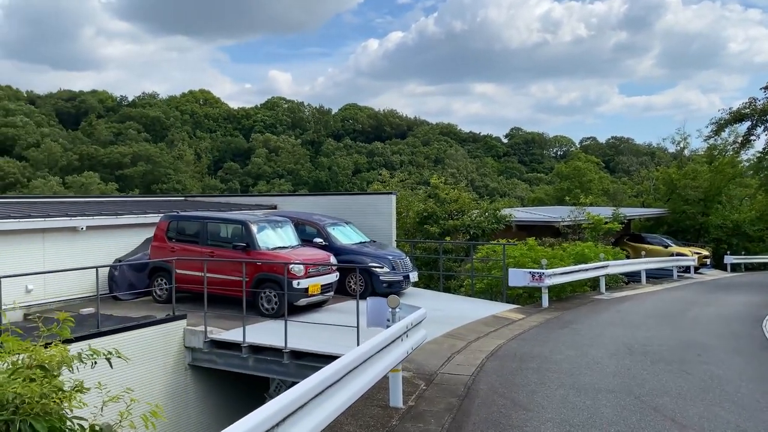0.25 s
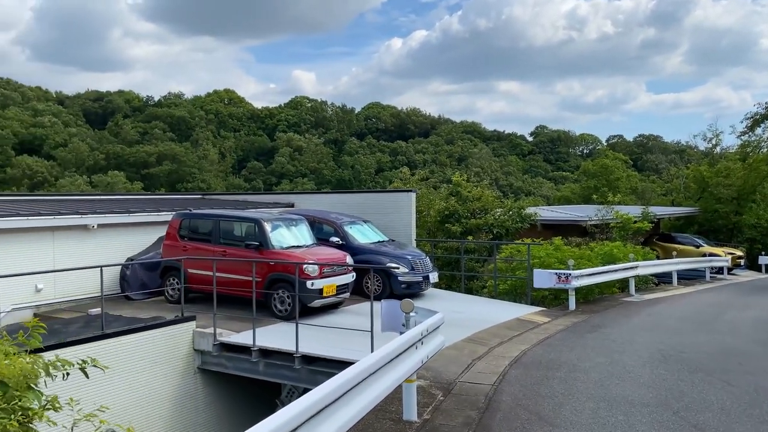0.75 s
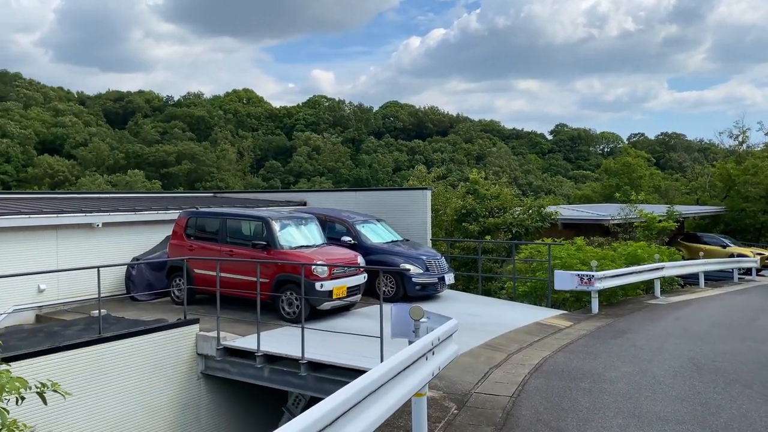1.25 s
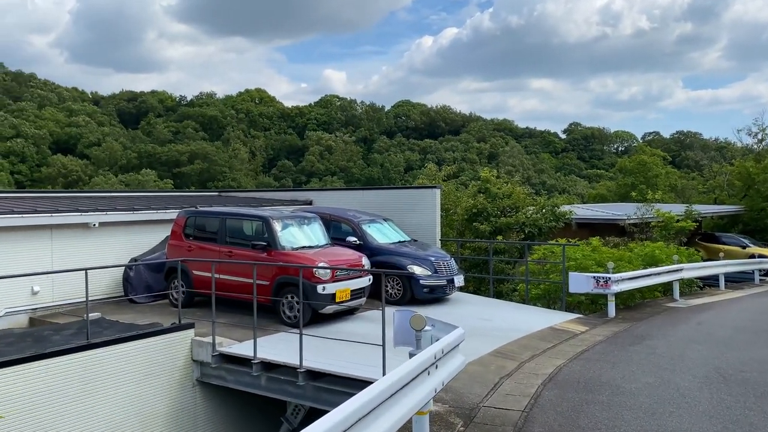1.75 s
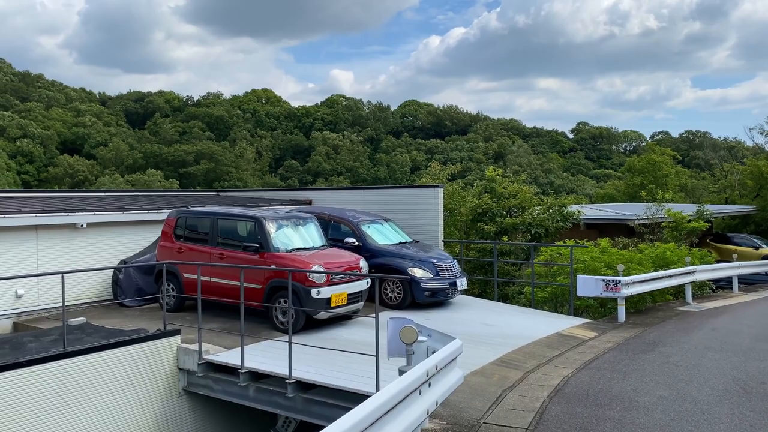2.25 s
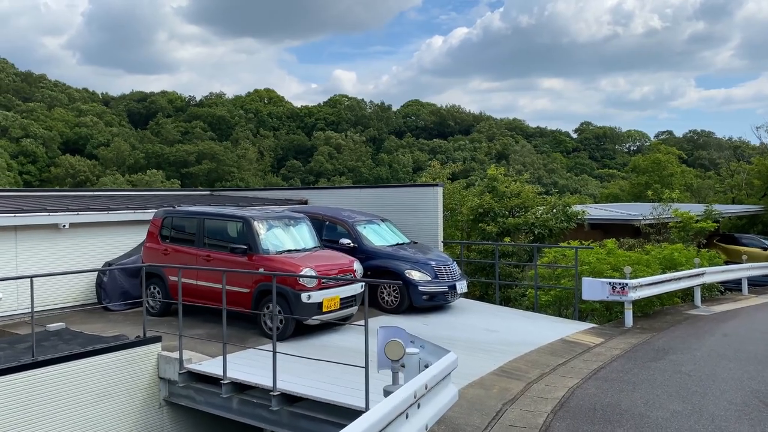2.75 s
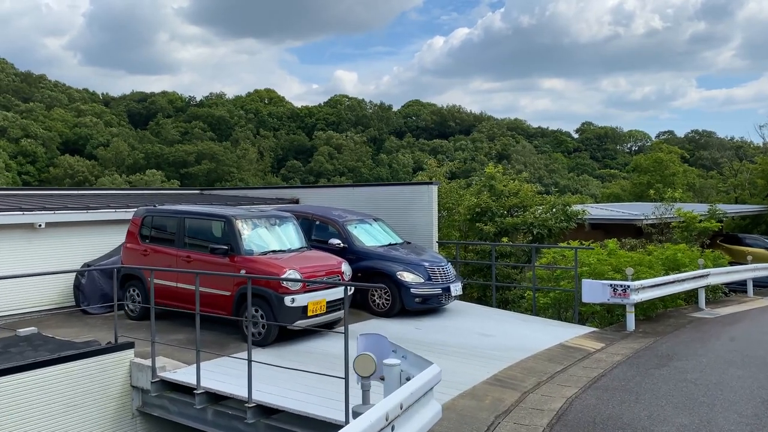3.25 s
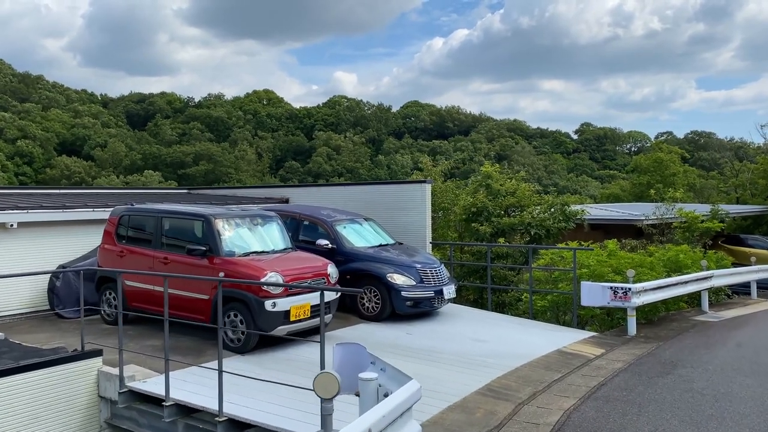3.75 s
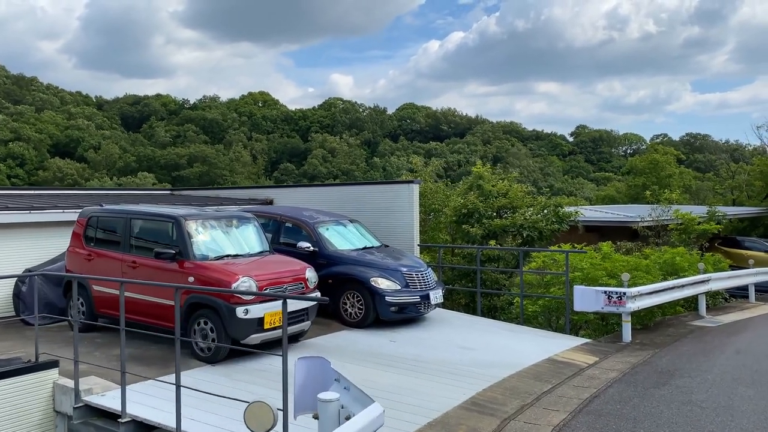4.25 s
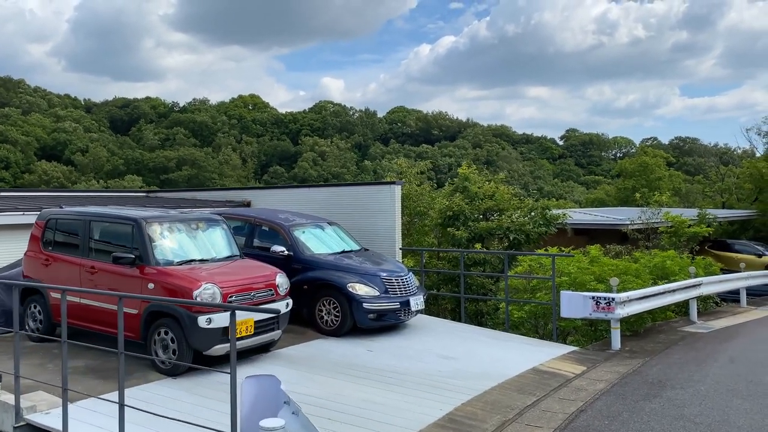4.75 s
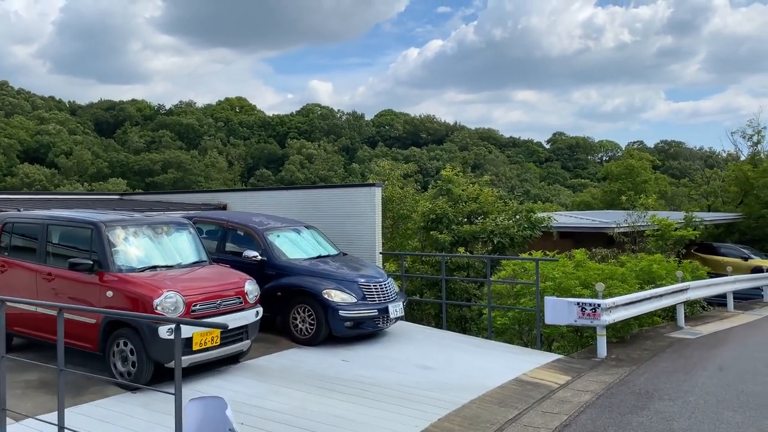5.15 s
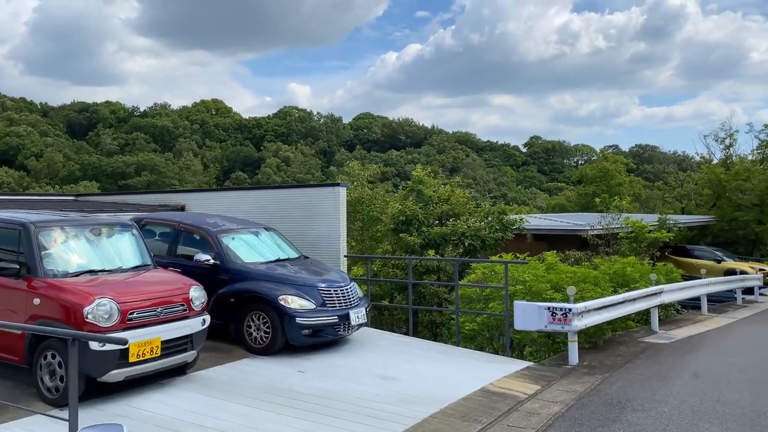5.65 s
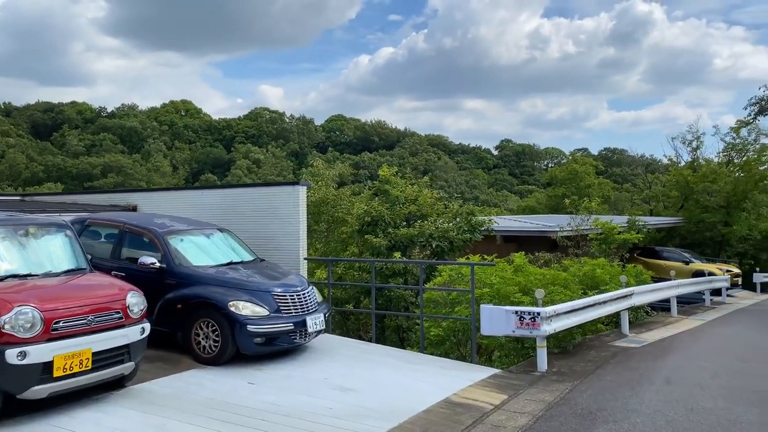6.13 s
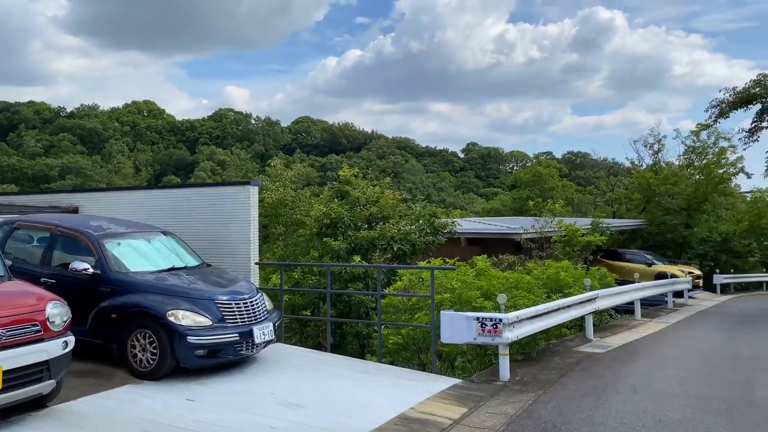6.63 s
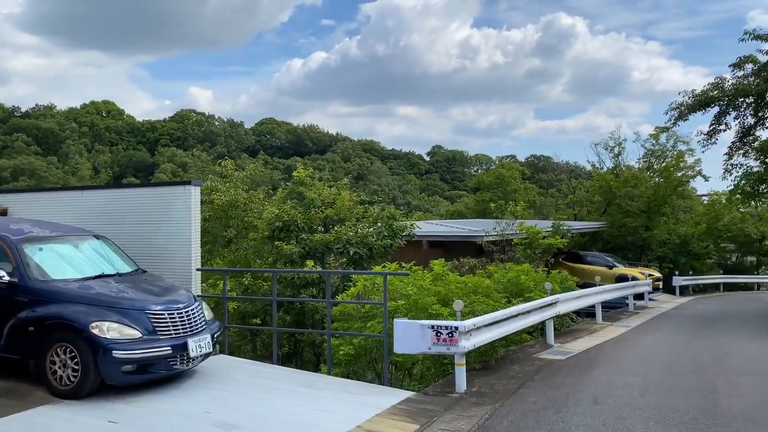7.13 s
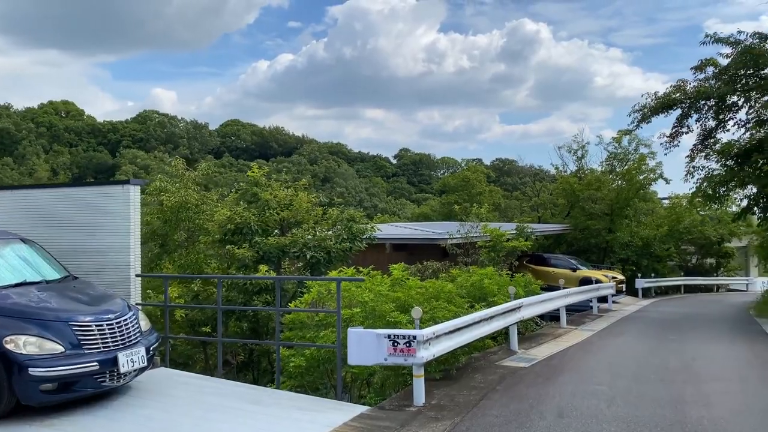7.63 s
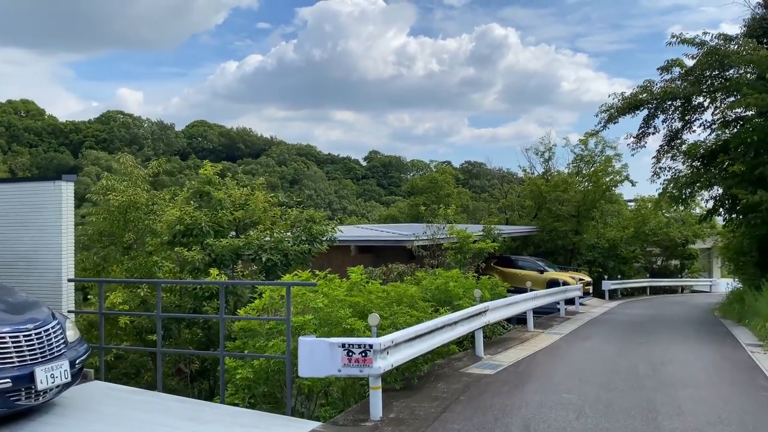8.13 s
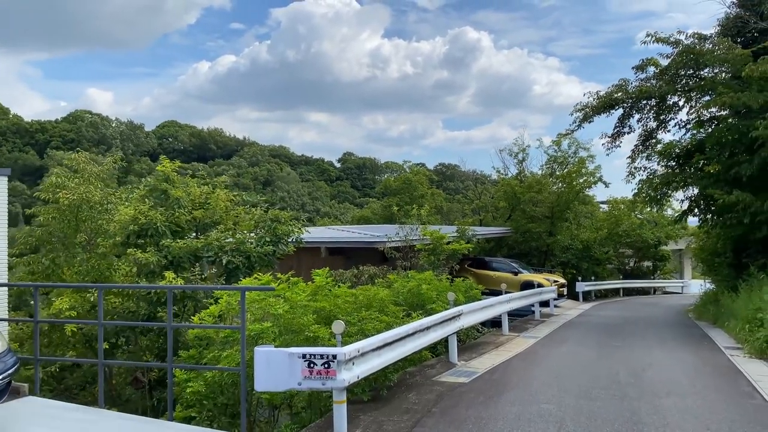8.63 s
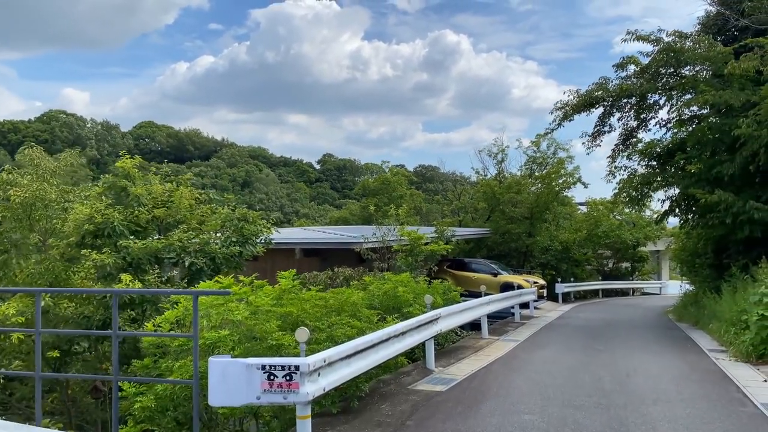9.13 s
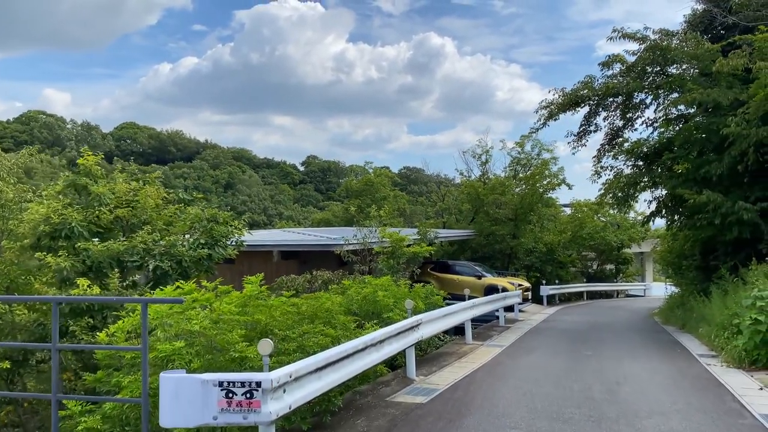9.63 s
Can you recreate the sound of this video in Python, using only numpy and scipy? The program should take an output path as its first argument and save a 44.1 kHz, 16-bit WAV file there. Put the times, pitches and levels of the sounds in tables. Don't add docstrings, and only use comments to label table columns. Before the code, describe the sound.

A dense, unbroken cicada chorus shimmers brightly over a quiet hillside road, with faint walking ticks and low hand-held rumble beneath it.

```python
import sys
import numpy as np
from scipy import signal
from scipy.fft import rfft, irfft
from scipy.io import wavfile
from scipy.ndimage import uniform_filter1d

SR = 44100
rng = np.random.default_rng(int(sys.argv[2]) if len(sys.argv) > 2 else 0)


def output_pcm(signal):
    pcm = np.clip(np.atleast_2d(signal).T, -1, 1) * 32767
    wavfile.write(sys.argv[1], SR, np.round(pcm).astype(np.int16))


def gain_from_decibels(decibels):
    exponent = np.asarray(decibels, float) / 20
    return 10 ** exponent


N = 435708

# pitch_hz, level_db (per Hz)
SONG_SPECTRUM = [(1940, -44), (3300, -27.5), (3730, -23.5), (5060, -2.5), (5760, 0.5), (6950, -4),
                 (8440, -0.5), (8830, -4), (9790, -15.5), (10300, -17), (12900, -12.5), (14400, -9),
                 (15500, -9)]
BAND_EDGES_HZ = (4900, 7000, 10200)
# start_db, approach_db_per_s (walking nearer), effort_share, view_db (gain by the open view)
SONG_BANDS = [
    (-63, 0.8759, 0.64, -0.9),
    (-46.5, 0.3634, 0.95, 0.3),
    (-47.5, -0.075, .5, 2.6),
    (-55, 0.56, .3, 0.3),
]
# time_s, effort_db
CROWD_EFFORT = [(0, 0.4), (.9, 0), (1.5, 1.2), (2.2, -0.7), (3.4, -0.1), (4.2, 0.1), (5.2, -1), (6.9, -0.6),
                (7.5, -0.1), (8.9, 0.74), (9.2, -0.5), (9.88, -0.5)]
# time_s, clicks_per_s
SOLO_CLICK_RATE = [(0, 397.6), (6.5, 398.4), (9.88, 399.5)]
# pitch_hz, gain_db
SOLO_COLOUR = [(4600, -10), (5300, -2), (6300, -1.5), (7000, -18), (11000, -4), (13000, 0.5), (14300, 3),
               (15700, 0)]
# time_s, effort_db
SOLO_EFFORT = [(0, 1.5), (1.2, -3), (3, -5), (4.2, 0), (5.4, -0.5), (7.2, -4), (8.2, -4), (9.88, 1)]
# time_s, pitch_hz, level_db
LOW_WHISTLE = [(0, 2670, -75), (.8, 2690, -84), (2.2, 2720, -73), (3.7, 2735, -75), (6.2, 2750, -73.5),
               (8.2, 2765, -71.5), (9.88, 2750, -75)]
# time_s, pitch_hz, level_db
HIGH_WHISTLE = [(0, 2890, -74), (.7, 2870, -84), (2.8, 2970, -78), (4.5, 3000, -72), (5.8, 2977, -72),
                (7.7, 3015, -75), (8.7, 3010, -77.5), (9.88, 2990, -65)]
# pitch_hz, level_db (per Hz)
VALLEY_SPECTRUM = [(16, -47), (28, -6.5), (35, -4.5), (48, -16.5), (91, -26), (119, -33.5), (161, -29),
                   (314, -40), (1040, -43.5), (1920, -49), (2210, -46), (2710, -39.5), (3250, -46.5),
                   (3600, -51), (4680, -67), (7920, -120)]
# centre_hz, width_hz, level_db
ARM_RESONANCES = [(2.64, 1.9, -6), (6.04, 1.2, 2), (9.4, 4.1, -7), (14.8, 3.1, -8), (20.8, 2.9, -19)]
# time_s, swing_db (of the arm), knock_db (through the grip)
JOLTS = [(.08, -31.5, -51), (.62, -29, -62), (.85, -30, -54), (1.119, -31, -56), (1.499, -40.5, -57),
         (1.9, -30.5, -69), (2.5, -26, -58), (3.18, -31.5, -57), (3.65, -38, -65), (4.03, -45, -59),
         (4.28, -34, -58), (4.8, -33.5, -63), (5.08, -36.5, -62), (5.45, -36, -61), (5.8, -33.5, -65),
         (6.65, -32.5, -64), (7.05, -35.5, -62), (7.3, -34.5, -67), (7.65, -37, -93), (7.969, -33, -73),
         (8.22, -33, -68), (8.55, -38, -56), (8.82, -39, -67), (9.15, -30.5, -67), (9.65, -34.5, -76)]
# start_s, peak_db, pitch_hz
CONTACTS = [(.025, -60, 3080), (.225, -78, 800), (.718, -59, 149), (1.122, -62, 148), (1.198, -63, 376),
            (1.298, -66, 505), (1.352, -54, 3100), (1.380, -59, 2980), (2.409, -59, 378), (2.510, -61, 573),
            (3.104, -66, 456), (4.338, -61, 330), (4.858, -62, 570), (4.942, -61, 304), (4.943, -59, 580),
            (4.944, -61, 880), (5.441, -60, 1750), (5.441, -63, 1350), (5.442, -61, 816), (5.98, -59, 150),
            (6.062, -61, 900), (7.401, -59, 446), (7.898, -60, 1680), (8.490, -58, 1200), (9.215, -55, 75),
            (9.220, -52, 148), (9.681, -61, 1260)]
# start_s, end_s, pitch_hz, level_db
FAR_HUM = [
    (0.33, .55, 216.3, -71.5),
    (2.845, 3.204, 214, -70.5),
]
# centre_s, centre_hz
PARTINGS = [(.256, 7600), (.256, 11750), (.337, 9100), (.42, 13100), (.42, 8650), (.813, 7650),
            (.813, 5200), (1.162, 14100), (2.031, 6500), (2.031, 9700), (2.137, 12750), (2.137, 4900),
            (2.137, 7040), (2.857, 11400), (3.309, 14400), (3.309, 6370), (3.447, 5830), (4.135, 11100),
            (4.135, 5200), (5.49, 10300), (5.723, 9700), (5.723, 6300), (6.234, 7600), (6.502, 6260),
            (6.782, 4760), (7.0, 13050), (7.0, 9700), (7.175, 9650), (7.175, 12100)]

SONG_TOP_HZ = 15745
VIEW_OPENS_S, VIEW_WIDENS_S = 4.8, 0.32
THROBS_PER_S, THROB_WANDER = 15.8, 0.015
WHISTLE_FLUTTER_DB = 1.4
VALLEY_LEVEL_DB = -67.0
RUMBLE_DB, RUMBLE_FOLLOWS = -74, 0.19
JOLT_RISE_S, SWING_FADE_S, KNOCK_FADE_S = 0.067, 0.18, 0.12
REST_SWING_DB, REST_THRUM_DB = -41.5, -65
TICK_T60_S, RING_CYCLES = 0.022, 5.2
PARTING_WIDTH_HZ = 1400


def rms_one(x):
    return x / np.sqrt(np.mean(x ** 2) + 1e-20)


def in_time(rows):
    time_s, *columns = np.transpose(rows)
    return [np.interp(np.arange(N) / SR, time_s, column) for column in columns]


def over_pitch(values):
    return np.interp(np.linspace(0, len(values) - 1, N // 2 + 1), np.arange(len(values)), values)


def colour(points):
    hz = np.maximum(np.arange(N // 2 + 1) * SR / N, 0.1)
    point_hz, point_db = np.transpose(points)
    return hz, gain_from_decibels(np.interp(np.log(hz), np.log(point_hz), point_db))


def drift(rate_hz):
    pole = np.exp(-80 * np.pi * rate_hz / SR)
    white = rng.standard_normal(N // 40 + 4002)
    slow = signal.lfilter([1], [1, -2 * pole, pole * pole], white)[4000:]
    return np.interp(np.arange(N) / 40, np.arange(len(slow)), rms_one(slow - slow.mean()))


def jolted(levels_db, fade_s, rest_db):
    t = np.arange(0, N, 64) / SR
    power = gain_from_decibels(2 * rest_db)
    for (jolt_s, *_), level_db in zip(JOLTS, levels_db):
        since = t - jolt_s
        rise, fade = since / JOLT_RISE_S * 2, -(since / fade_s) ** 2
        power = power + gain_from_decibels(2 * level_db) * np.exp(np.where(since < 0, rise, fade))
    return np.interp(np.arange(N) / SR, t, 10 * np.log10(power))


def singer(clicks_per_s, loudness, uneven_db, scatter_s, weak_drum_db):
    count = np.floor(rng.random() + np.cumsum(clicks_per_s) / SR)
    beat = (np.diff(count, prepend=0) > 0) * gain_from_decibels(weak_drum_db * (count % 2))
    clicks = beat * loudness * gain_from_decibels(uneven_db * rng.standard_normal(N))
    delay_s = scatter_s * over_pitch(rng.random(400))
    phase = 2 * np.pi * np.cumsum(delay_s) * SR / N
    return rfft(clicks / np.sqrt(np.mean(clicks_per_s))) * np.exp(-1j * phase)


def far_crowd():
    bodies = gain_from_decibels(8 * rng.standard_normal((18, 120)))
    bodies = bodies / np.sqrt(np.sum(bodies ** 2, axis=0))
    crowd = 0
    for clicks_per_s, body in zip(np.geomspace(300, 520, 18), bodies):
        rate = clicks_per_s * (1 + 0.01 * drift(0.4) + 0.007 * drift(25))
        swell = gain_from_decibels(1.3 * drift(0.3) + 0.8 * drift(20))
        voice = singer(rate, swell, uneven_db=3.5, scatter_s=0.017, weak_drum_db=-0.5)
        crowd = crowd + over_pitch(body) * voice
    return crowd / np.sqrt(uniform_filter1d(np.abs(crowd) ** 2, size=500))


def near_singer():
    throbs_per_s = THROBS_PER_S * (1 + THROB_WANDER * drift(0.44))
    throb_phase = 2 * np.pi * np.cumsum(throbs_per_s) / SR + 1.14 + 0.53 * drift(1.1)
    throb = 1 + 1.8 * np.cos(throb_phase)
    effort_db, = in_time(SOLO_EFFORT)
    rate = in_time(SOLO_CLICK_RATE)[0] * (1 + 0.0012 * drift(1.5) + 0.0012 * drift(30))
    return singer(rate, throb * gain_from_decibels(effort_db), uneven_db=0.5, scatter_s=0.008, weak_drum_db=-5.0)


def chorus():
    crowd, solo = far_crowd(), near_singer()
    match = np.sqrt(np.mean(np.abs(crowd) ** 2) / np.mean(np.abs(solo) ** 2))
    solo = solo * match * gain_from_decibels(-8.5) * colour(SOLO_COLOUR)[1]
    hz, song = colour(SONG_SPECTRUM)
    voices = (crowd + solo) * song * (hz < SONG_TOP_HZ)
    above = [1] + [1 / (1 + np.exp((edge_hz - hz) / 250)) for edge_hz in BAND_EDGES_HZ] + [0]
    t = np.arange(N) / SR
    effort_db, = in_time(CROWD_EFFORT)
    view = 1 / (1 + np.exp((VIEW_OPENS_S - t) / VIEW_WIDENS_S))
    flutters_db = (1.3, 0.3, 0.2, 0.3)
    out = 0
    for lower, upper, settings, flutter_db in zip(above, above[1:], SONG_BANDS, flutters_db):
        start_db, approach_db_per_s, effort_share, view_db = settings
        level_db = start_db + approach_db_per_s * t + effort_share * effort_db + view_db * view
        band = rms_one(irfft(voices * (lower - upper), N))
        out = out + gain_from_decibels(level_db + flutter_db * drift(10.4)) * band
    return out


def whistlers():
    out = 0
    for table, wavers_per_s in ((LOW_WHISTLE, 40), (HIGH_WHISTLE, 60)):
        pitch_hz, level_db = in_time(table)
        phase = 2 * np.pi * np.cumsum(pitch_hz) / SR
        loudness = gain_from_decibels(level_db + WHISTLE_FLUTTER_DB * drift(12))
        tone = drift(wavers_per_s) * np.cos(phase) + drift(wavers_per_s) * np.sin(phase)
        out = out + loudness * tone
    return out


def valley():
    hz, tone = colour(VALLEY_SPECTRUM)
    noise = rfft(rng.standard_normal(N)) * tone
    deep, low = 1 / (1 + (hz / 85) ** 6), 1 / (1 + (hz / 270) ** 6)
    knock_db = jolted(np.transpose(JOLTS)[2], KNOCK_FADE_S, REST_THRUM_DB)
    thrum = gain_from_decibels(knock_db + 0.5) * rms_one(irfft(noise * deep * (hz > 26), N))
    rumble_db = RUMBLE_DB + RUMBLE_FOLLOWS * (knock_db - knock_db.mean()) + 3.2 * drift(11)
    rumble = gain_from_decibels(rumble_db) * rms_one(irfft(noise * (low - deep), N))
    hum = gain_from_decibels(VALLEY_LEVEL_DB + 0.5 * drift(4.9)) * rms_one(irfft(noise * (1 - low), N))
    return thrum + rumble + hum


def shake():
    hz = np.arange(N // 2 + 1) * SR / N
    arm = 0
    for centre_hz, width_hz, level_db in ARM_RESONANCES:
        arm = arm + gain_from_decibels(level_db) / (1 + ((hz - centre_hz) / (width_hz / 2)) ** 2)
    sway = rms_one(irfft(rfft(rng.standard_normal(N)) * arm / (1 + (hz / 30) ** 4), N))
    settle = np.exp(-np.arange(N) / (0.12 * SR))
    swing_db = jolted(np.transpose(JOLTS)[1], SWING_FADE_S, REST_SWING_DB)
    return gain_from_decibels(swing_db) * (sway - sway[0] * (settle + settle[::-1])) + 0.038 * settle


def steps():
    out, t = np.zeros(N), np.arange(8192) / SR
    out = np.pad(out, (0, 8192))
    grit_band = signal.butter(2, [250, 1900], "band", fs=SR, output="sos")
    grit = signal.sosfilt(grit_band, rng.standard_normal((len(CONTACTS), 8192)))
    turns = rng.random(len(CONTACTS))
    for (start_s, peak_db, pitch_hz), turn, crush in zip(CONTACTS, turns, grit):
        decay = gain_from_decibels(-60 * t / (TICK_T60_S + RING_CYCLES / pitch_hz))
        note = np.sin(2 * np.pi * (pitch_hz * t + turn)) * decay * (1 - np.exp(-t / 0.0057))
        note += gain_from_decibels(-11.0) * crush * gain_from_decibels(-60 * t / 0.049)
        at = round(start_s * SR)
        out[at:at + 8192] += gain_from_decibels(peak_db + 10.5) * note
    return out[:N]


def far_hum():
    out, t = np.zeros(N), np.arange(N) / SR
    for start_s, end_s, pitch_hz, level_db in FAR_HUM:
        swell = np.clip(np.minimum(t - start_s, end_s - t) / 0.029, 0, 1)
        out += gain_from_decibels(level_db + 0.7 * drift(15)) * swell * np.sin(2 * np.pi * pitch_hz * t)
    return out


def scene():
    mono = chorus() + whistlers() + valley() + shake() + steps() + far_hum()
    return np.tile(mono, (2, 1))


def low_pass(x):
    return signal.sosfilt(signal.butter(12, 15810, fs=SR, output="sos"), x)


def record(dry):
    side, hz = np.zeros(N), np.arange(1025) * SR / 2048
    window = np.hanning(2048)
    for centre_s, centre_hz in PARTINGS:
        at = round(centre_s * SR) - 1024
        in_band = np.abs(hz - centre_hz) < PARTING_WIDTH_HZ / 2
        level = np.abs(rfft(dry[0, at:at + 2048] * window)) * in_band
        burst = irfft(level * np.exp(2j * np.pi * rng.random(1025)))
        side[at:at + 2048] += gain_from_decibels(4.5) * window ** 1.4 * burst
    return low_pass(dry + side * [[1], [-1]])


dry = scene()
out = record(dry)
output_pcm(out)
```